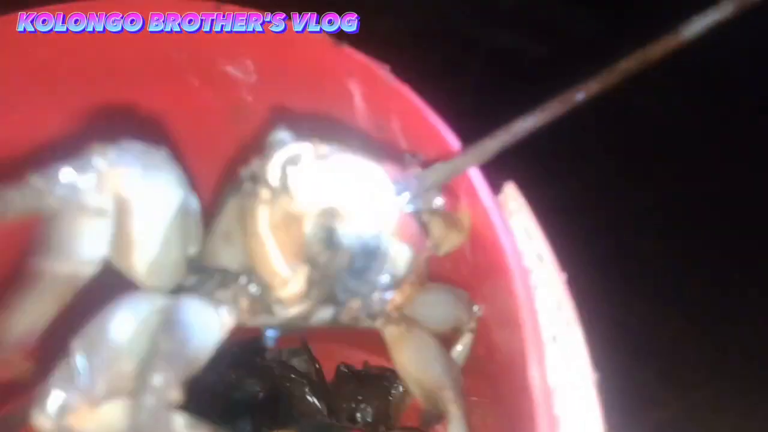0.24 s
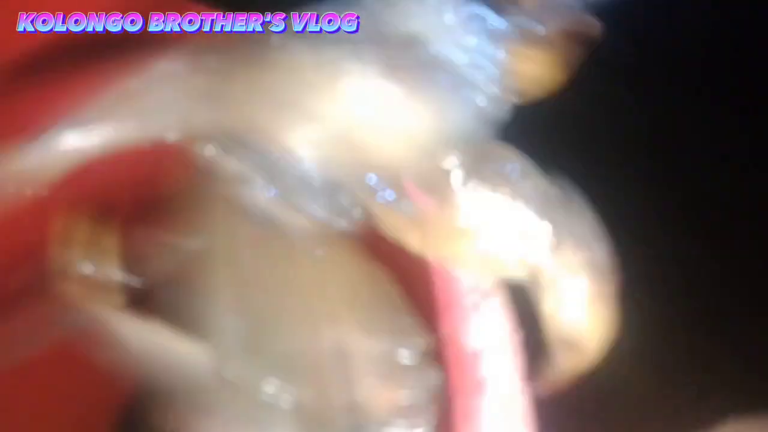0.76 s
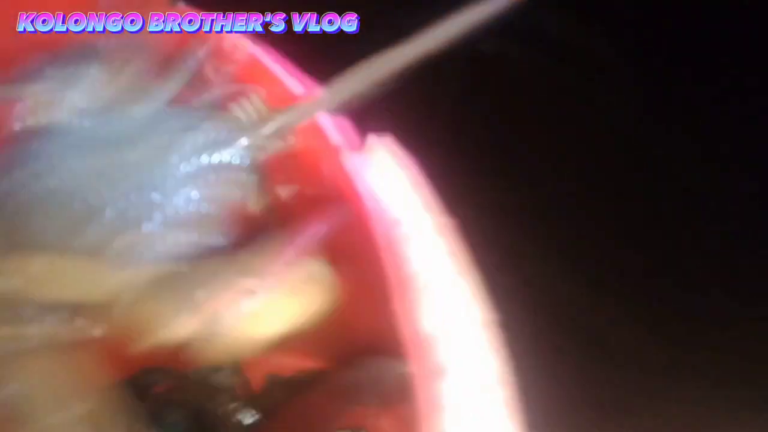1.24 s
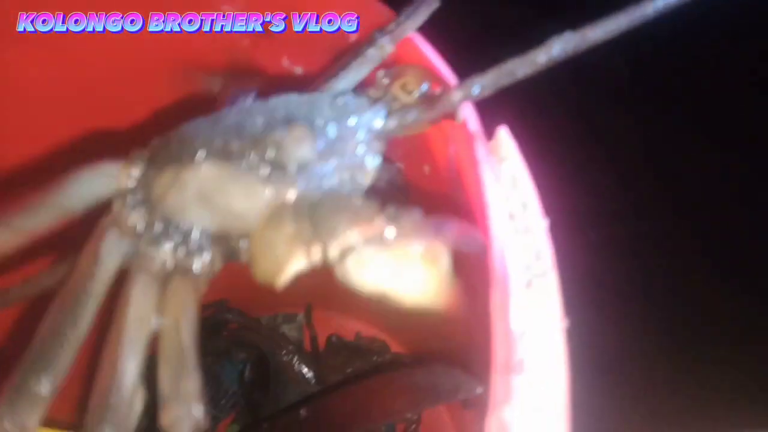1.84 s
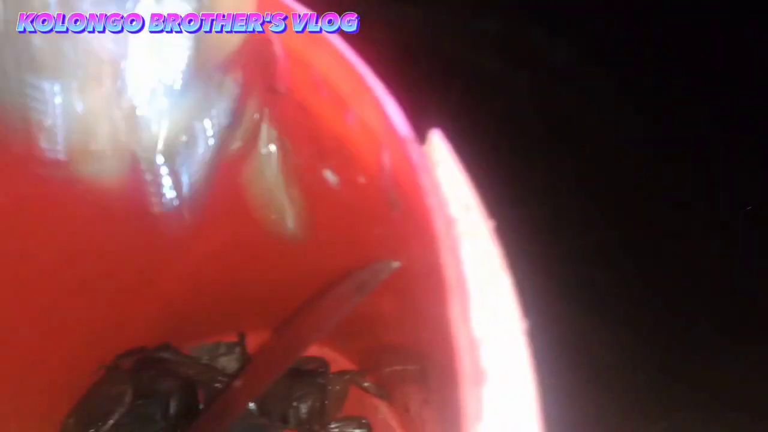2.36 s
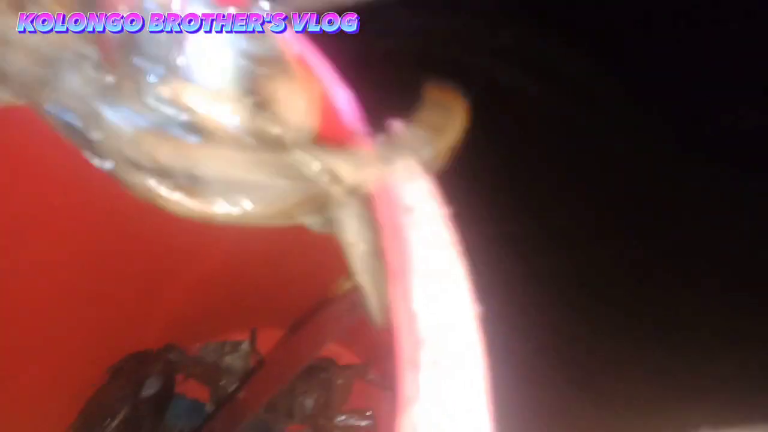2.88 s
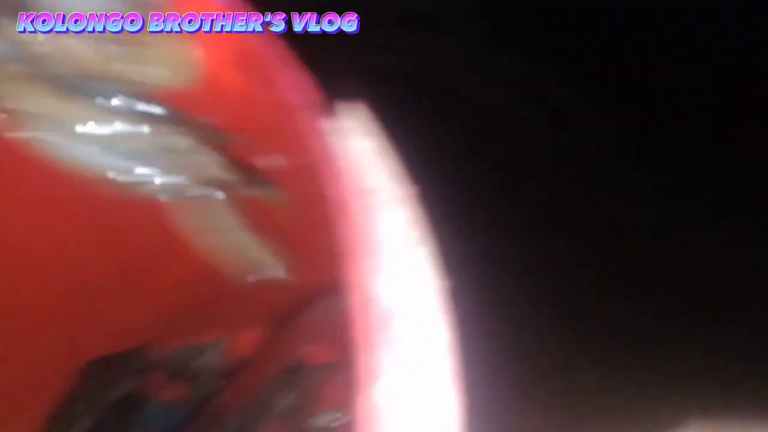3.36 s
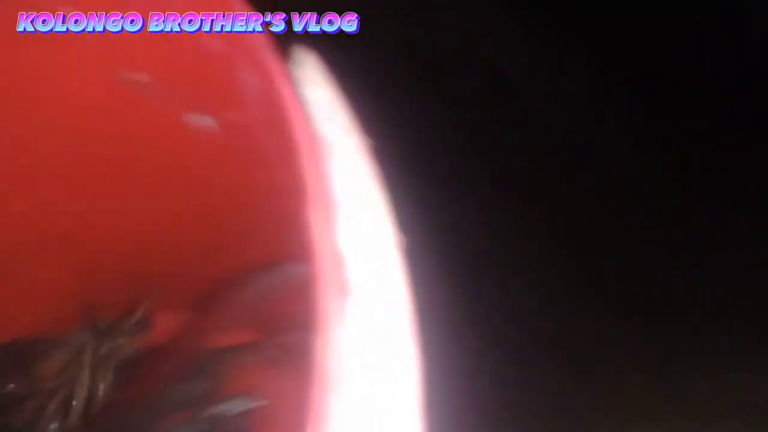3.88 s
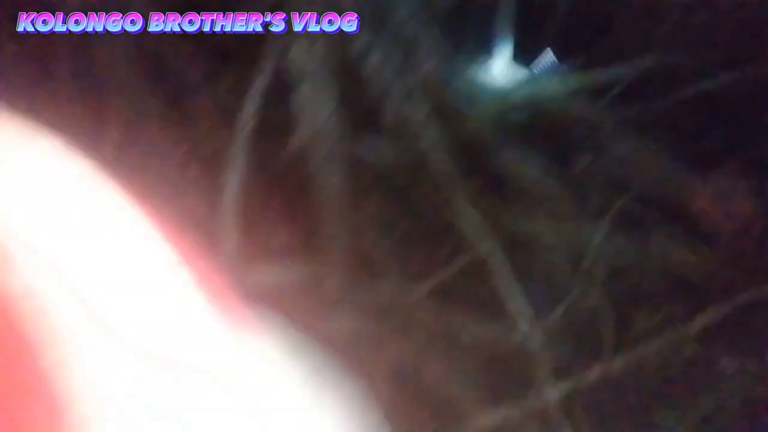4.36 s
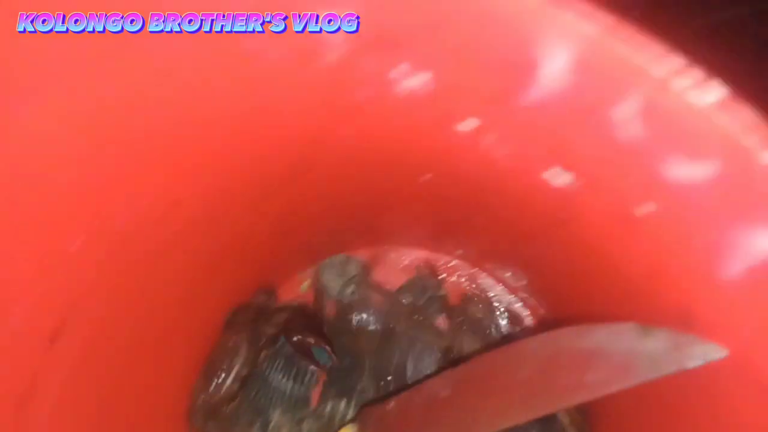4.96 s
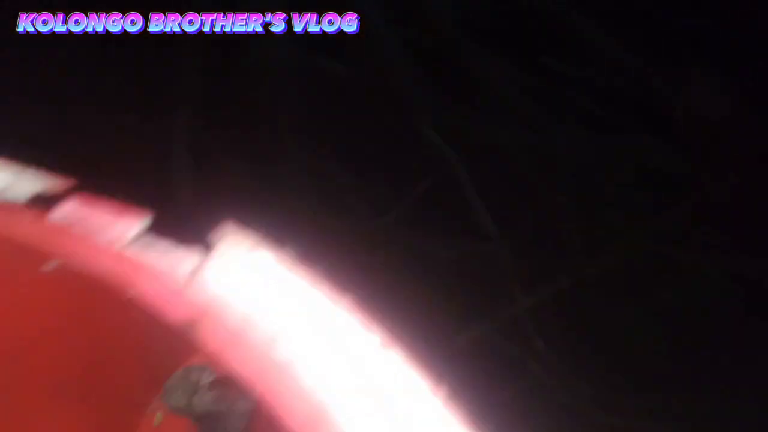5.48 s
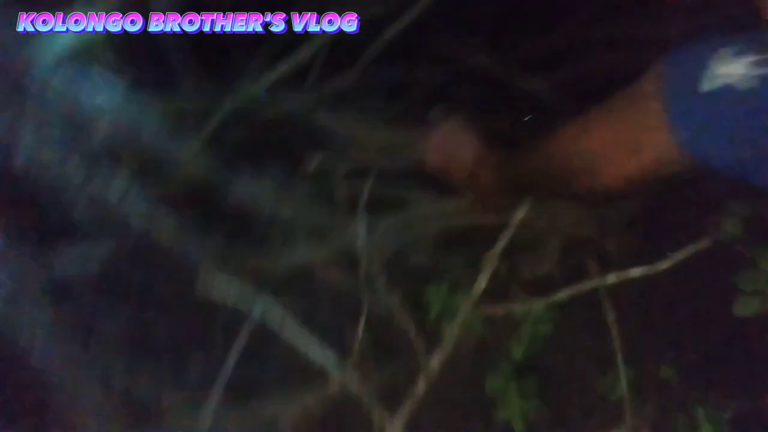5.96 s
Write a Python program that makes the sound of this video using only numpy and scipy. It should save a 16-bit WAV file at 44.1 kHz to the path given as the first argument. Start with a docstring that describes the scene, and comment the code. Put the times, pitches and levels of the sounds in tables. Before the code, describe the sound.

Hard shells click and clatter on hollow plastic, mid-pitched and quickly damped, with short gritty leg scrapes between. A busy first second gives way to separated knocks and drags, then a deep bump near four seconds and lighter rapid taps as the bucket moves through brush. A last tight cluster fades to faint scrabbling. Close, mono, dry outdoor night sound with little bass, soft hiss and very faint thin insects.

```python
"""Outdoors at night, crabs scrabble in a plastic bucket held close to a small microphone.
Claws and shells tap the wall, bodies bump it, and legs scrape along it in runs of tiny slips.
Short clicks stand for all these touches and set the bucket's modes (its own pitches) ringing.
Shaped noise gives a low rumble, a soft hiss, a later brush rustle and thin bands of night insects."""
import sys
import numpy as np
from scipy import signal
from scipy.fft import rfft, irfft, next_fast_len
from scipy.io import wavfile
from scipy.ndimage import uniform_filter1d, minimum_filter1d

SR = 44100
rng = np.random.default_rng(int(sys.argv[2]) if len(sys.argv) > 2 else 0)


def unload_audio(sound):
    """Save the sound as a 16-bit wav file, at the path given as the first command line argument."""
    columns = np.transpose(np.atleast_2d(sound))
    # keep every value between -1 and 1, then stretch to whole-number steps
    steps = np.round(np.clip(columns, -1, 1) * 32767)
    wavfile.write(sys.argv[1], SR, steps.astype(np.int16))


N = 274434

# stiff shell and rim modes of the bucket: f/Hz, width/Hz, level/dB
SHELL_MODES = [(1185, 88, -12), (1391, 93, -1.5), (1553, 176, 1), (1762, 88, -0.5), (1905, 91, 4),
               (2100, 69, -4.5), (2354, 280, 8.5), (2566, 460, 11.5), (3040, 155, 1), (3275, 48, -7),
               (4210, 720, -31), (4540, 770, -7.5)]
# slow bending modes of the bucket wall: f/Hz, width/Hz, level/dB
WALL_MODES = [(119, 56, -19), (180.8, 55, -6), (315.2, 43.3, -3), (402, 69, -2.5), (476.6, 57, 1),
              (559, 158, -1), (725.5, 83, 3.5), (1014, 91, 1)]
# faint scrabble of the whole heap: t/s, level/dB, wall boom re scrabble/dB
HEAP_STIR = [(0, -47, -4.5), (1.3, -43.5, -7), (1.75, -54.5, -3.5), (2.299, -43, -6), (2.801, -58, -0.5),
             (3.299, -47, 3.5), (4.0, -41, -4.5), (4.8, -42.5, -9.5), (5.75, -52, -9), (5.92, -52.5, -55),
             (6.11, -61.5, -34), (6.22, -52.5, -30)]


def amp(db):
    """Turn dB into a gain."""
    return 10 ** (np.asarray(db) / 20)


def rms_one(x):
    """Scale to rms 1."""
    return x / np.sqrt(np.mean(x ** 2) + 1e-20)


def drift(rate_hz):
    """Slow chance: noise smoothed twice by a one-pole low-pass, spread 1."""
    r = np.exp(-2 * np.pi * rate_hz / SR)
    noise = rng.standard_normal(N + SR)
    settled = signal.lfilter([1], [1, -2 * r, r * r], noise)[SR:]     # skip the filter's first second
    return rms_one(settled)


def coloured(x, spectrum):
    """Shape by a smooth spectrum (f/Hz, level/dB), with the phase that lets nothing sound early."""
    size = 2 * next_fast_len(N // 2 + 1)
    hz, db = np.transpose(spectrum)
    bins_hz = np.fft.rfftfreq(size, 1 / SR)
    gain = amp(np.interp(np.log(bins_hz + 1), np.log(hz), db))
    # folding the cepstrum (spectrum of the log gain) forward in time gives that phase
    cepstrum = irfft(np.log(gain), size)
    cepstrum[1:size // 2] *= 2
    response = np.exp(rfft(cepstrum[:size // 2 + 1], size))
    return irfft(rfft(x, size) * response, size)[:N]


def ring(x, hz, width_hz):
    """One mode: a unit click starts a dying wave of height 1; a wider mode dies sooner."""
    r, w = np.exp(-np.pi * width_hz / SR), 2 * np.pi * hz / SR
    return signal.lfilter([1, -r * np.cos(w)], [1, -2 * r * np.cos(w), r * r], x + 1e-18)


def soften(x):
    """Plastic swallows the top of the ringing: a low-pass at 2608 Hz."""
    return signal.sosfilt(signal.butter(4, 2608, fs=SR, output="sos"), x)


def taps():
    """Claws and shells hit the wall: each tap gives a shell click, a wall boom and a bright tick."""
    # blows before softening: t/s, level/dB, wall boom re level/dB, tick re level/dB
    tap_table = [(0.0203, -5, -7, -40), (0.1252, -29.5, 9.5, -42), (0.2815, -21.5, 1, -28),
                 (0.322, -4.5, -17.5, -24), (0.399, -15, -16, -22), (0.4425, -3, -23, -19.5),
                 (0.5538, -10, -26, -21.5), (0.646, -16, -46, -51), (0.718, -0.5, -33, -21),
                 (0.7453, -1.5, -22, -33), (0.871, -25, -51, -19), (0.8915, -15, -10, -10.5),
                 (0.952, -8.5, -11.5, -32), (0.9962, -3, -32, -31), (1.0068, 0, -34, -8),
                 (1.0716, 2.5, -18, -26), (1.2439, 0, -7.5, -22.5), (1.2971, -18.5, -38, -13.5),
                 (1.6269, -2, -5.5, -16.5), (1.8997, -1.5, -3, -20.5), (2.0299, -16, -9, -24),
                 (2.0763, 4, -15.5, -16.5), (2.255, -21.5, -5.5, -13.5), (2.3564, -8, -9, -40),
                 (2.4015, 3.5, -13, -46), (2.6935, -1.5, -28, -19.5), (2.869, -31.5, 2.5, -10),
                 (3.6863, -1.5, -54, -19.5), (3.665, -27, -35, -30), (3.7738, -19.5, -18, -15),
                 (3.953, -15, -12, -23), (4.028, -16, -39, -26), (4.106, -20, -5, -25),
                 (4.148, -15.5, -9, -20), (4.1607, -11, -25, -29), (4.197, -10, -19, -24),
                 (4.236, -18, -10, -11), (4.2451, -15, -30, -29), (4.2621, -15, -16, -6.5),
                 (4.3982, -16.5, -14, -18.5), (4.5195, -25, -5, -26), (4.5376, -12, -6, -35),
                 (4.757, -20.5, -3, -43), (4.7713, -3.5, -46, -20), (4.793, -22, -39, -22),
                 (4.806, 2, -23, -10), (4.8407, -13.5, -40, -21), (4.9866, -19, -4, -17),
                 (5.05, -23, -18, -9), (5.1033, -15, -20, -44), (5.1534, -15.5, -43, -41),
                 (5.3158, -21, -11, -29), (5.3666, -15.5, -17, -32), (5.457, -12, -21, -52),
                 (5.4807, -4.5, -33, -26), (5.4933, -8, -12, -26), (5.5135, -10, -13, -28),
                 (5.673, -5, -32, -26), (5.7089, -3.5, -30, -22), (5.7187, -1, -45, -37),
                 (6.133, -35, -30, -14)]
    s, db, boom_db, tick_db = np.transpose(tap_table)
    clicks = np.zeros(N)
    clicks[(s * SR).astype(int)] = amp(db + tick_db)
    return strike(SHELL_MODES, s, db) + strike(WALL_MODES, s, db + boom_db) + tick(clicks)


def strike(modes, at, blow_db):
    """A blow and two quick, weaker bounces ring the modes; the first touch drives all the same way."""
    bounce_s, bounce_db = 0.00249, -7     # scale of the gap before a bounce; loss at each bounce
    out = np.zeros(N)
    gaps = bounce_s * rng.uniform(0.43, 1.629, (len(at), 3)) * [0, 1, 1]
    lags = np.cumsum(gaps, axis=1)
    where = ((at[:, None] + lags) * SR).astype(int)
    for hz, width_hz, mode_db in modes:
        clicks = np.zeros(N)
        touch_db = blow_db[:, None] + mode_db + bounce_db * np.arange(3)
        size = amp(touch_db) / np.sqrt(len(modes))     # the modes share the blow
        # powers 0, 1, 2: only the middle touch has a chance sign
        sign = rng.choice([-1, 1], where.shape) ** np.arange(3)
        np.add.at(clicks, where, size * sign)
        out += ring(clicks, hz, width_hz)
    return soften(out)


def tick(clicks):
    """Hard contact above the modes: each click gives a spit of bright noise that dies in a few ms."""
    # colour of the spit: f/Hz, level/dB
    tick_spectrum = [(2000, -5.5), (3500, 21), (4570, 13), (5640, -5), (8360, -5.5), (10800, -17),
                     (15500, -22)]
    t60_s = 0.0096     # time to fade by 60 dB
    fade = signal.lfilter([1], [1, -amp(-60 / (t60_s * SR))], np.abs(clicks))
    return coloured(fade * rng.standard_normal(N), tick_spectrum)


def bumps():
    """A body's long soft contact drives only the wall modes near the pitch its place favours."""
    # bumps before the low-pass: t/s, level/dB, favoured pitch f/Hz
    bump_table = [(0.214, -4.5, 185.4), (0.744, 5, 205), (0.883, -7, 186.5), (0.94, -3, 172.4),
                  (1.068, 2, 301), (2.087, -8.5, 185), (3.945, 15.5, 143.6), (3.983, -8.5, 170),
                  (4.462, 1.5, 381), (4.493, -9, 398), (4.559, -3.5, 385), (4.602, -10.5, 404),
                  (4.904, -16.5, 316), (4.986, -11, 312)]
    s, db, place_hz = np.transpose(bump_table)
    out = np.zeros(N)
    for hz, width_hz, mode_db in WALL_MODES:
        octaves_off = np.abs(np.log2(hz / place_hz))
        clicks = np.zeros(N)
        clicks[(s * SR).astype(int)] = amp(db + mode_db - 92 * octaves_off)
        out += ring(clicks, hz, width_hz)
    return signal.sosfilt(signal.butter(2, 396, fs=SR, output="sos"), out)     # low-pass, Hz


def scraping():
    """Leg tips stick and slip: clumped clicks of uneven size under the pressure of drags and heap."""
    # legs dragging on the plastic: start t/s, length/s, crest level/dB, place of crest (0-1),
    # wall boom re scrape/dB
    drag_table = [(0.004, 0.039, -21.5, 0.67, 5), (0.19, 0.033, -18.5, 0.6, 4),
                  (0.254, 0.011, -22.5, 0, -0.5), (0.345, 0.015, -23, 0.5, -27),
                  (0.439, 0.1, -10.5, 0.77, 0), (0.643, 0.055, -26.5, 0.4, -28),
                  (0.709, 0.1, -17.5, 0.04, -7), (0.819, 0.012, -40, 0.9, -17), (0.882, 0.069, -35, 0.6, 0),
                  (0.945, 0.22, -29.5, 0, -12.5), (1.129, 0.066, -32, 0.3, 10), (1.162, 0.1, -18, 0.63, 3),
                  (1.39, 0.047, -28.5, .8, -10), (1.465, 0.0093, -26, 0.5, -7), (1.719, 0.022, -33, 1, -19),
                  (1.924, 0.024, -17, .05, -7), (2.021, 0.16, -20.5, 0.32, -2),
                  (2.213, 0.21, -38.5, 0.7, -1), (2.402, 0.11, -25, 0.12, 1),
                  (2.529, 0.071, -31, 0.2, -0.5), (2.568, 0.12, -19, 0.47, 3.5),
                  (2.865, 0.052, -29, 1, -9.5), (2.982, 0.051, -27, 0.1, -34),
                  (3.051, 0.12, -15.5, 0.23, 1), (3.322, 0.049, -35.5, 0.63, 10.5),
                  (3.526, 0.061, -15.5, 0.67, -6.5), (3.623, 0.019, -36.5, 0.1, -30),
                  (3.692, 0.032, -11, 0.8, -29), (3.799, 0.056, -19.5, 0.2, -11.5),
                  (3.951, 0.26, -33, 0, -10), (4.218, 0.048, -21, 0.6, -3.5),
                  (4.451, 0.016, -12.5, 0.3, -8.5), (4.476, 0.024, -21, 0.4, -9.5),
                  (4.634, 0.099, -30.5, 0.6, -16), (4.908, 0.0077, -25.5, 0, -1),
                  (5.086, 0.17, -35, 0.6, -7.5), (5.398, 0.038, -20, 0, -21), (5.473, 0.19, -31, 0, -7),
                  (5.668, 0.028, -18.5, 0.1, -35), (5.695, 0.17, -31.5, 0.26, -2),
                  (6.056, 0.0057, -34.5, 0.29, -36)]
    heap_s, heap_levels, heap_booms = np.transpose(HEAP_STIR)
    time = np.arange(N) / SR
    heap_db, heap_boom_db = np.interp(time, heap_s, heap_levels), np.interp(time, heap_s, heap_booms)
    pressure = amp(heap_db + 5.8 * drift(16.3))     # the heap stirs in fits
    boom = pressure * amp(heap_boom_db)
    for s, length, crest_db, crest, boom_db in drag_table:
        a, b = round(s * SR), round((s + length) * SR)
        shape = stroke(b - a, crest)
        pressure[a:b] += amp(crest_db) * shape
        boom[a:b] += amp(crest_db + boom_db) * shape

    # a drag bites at once and lets go a little later
    edge_s = 0.0046
    ease = np.exp(-1 / (edge_s * SR))
    eased = signal.lfilter([1 - ease], [1, -ease], [pressure, boom])
    pressure, boom = np.maximum([pressure, boom], eased)
    dryness = pressure / boom     # shell on shell: little boom, more bite
    lightness = 1 / (1 + pressure / amp(-21.0))     # a light touch stutters, a hard drag rasps evenly

    slips_per_s, size_spread_db, clump_db = 2500, 2.5, 4.5
    uneven_db = size_spread_db * (0.6854 + 0.33 * lightness) * np.minimum(rng.exponential(1, N), 4)
    sizes = amp(uneven_db + lightness * clump_db * drift(61))
    slips = sizes * (rng.random(N) < slips_per_s / SR) * rng.choice([-1, 1], N)
    # the drag spends its force at an even pace, levelled over 0.09 s
    slips /= np.sqrt(uniform_filter1d(slips ** 2, round(.09 * SR)))

    shell = rub(SHELL_MODES, slips, pressure, dryness, lightness)
    # dryness 1.12: legs drive the lowest wall modes slightly less than the higher ones
    wall = rub(WALL_MODES, slips, boom * amp(0.5), 1.12, lightness)     # boom raised 0.5 dB
    spit = tick(slips ** 2 * pressure * amp(-63.5))     # squaring favours the big slips
    return shell + wall + spit


def stroke(count, crest):
    """Pressure of one drag: bites, swells to its crest, then dies away; top 1."""
    bite = 0.32     # share of the crest at first contact
    u = (np.arange(count) + .5) / count
    crest = np.clip(crest, .01, .99)
    swell = bite + (1 - bite) * (u / crest) ** 0.99
    fade = (1 - u) / (1 - crest)
    return np.where(u < crest, swell, fade)


def rub(modes, slips, pressure, dryness, lightness):
    """The contact point wanders, most under a light touch, so each mode swells on its own."""
    even, pressed = 0, 0
    for hz, width_hz, db in modes:
        wander_db = lightness * 5.88 * drift(75) + 2.16 * drift(21.0)
        drive = slips * amp(db + wander_db)
        tilt = dryness ** (0.5 * np.log2(hz / 2100))     # a dry contact leans on the high modes
        even = even + ring(drive, hz, width_hz)
        pressed = pressed + ring(drive * pressure * tilt, hz, width_hz)
    # dividing by the same rub at pressure 1 lets the pressure set the level
    return soften(pressed) / np.std(soften(even))


def stray_taps():
    """Leg tips click on shells at random, stronger where the heap stirs more."""
    taps_per_s, above_heap_db, spread_db = 12, 14.5, 6.8
    s = rng.uniform(0, N / SR - .02, round(taps_per_s * N / SR))
    heap_s, heap_levels, _ = np.transpose(HEAP_STIR)
    heap_db = np.interp(s, heap_s, heap_levels)
    return strike(SHELL_MODES, s, heap_db + above_heap_db + rng.normal(0, spread_db, len(s)))


def rustle():
    """The bucket is carried through brush: patchy bright noise that comes in swishes."""
    # course of the rustle, around which it drifts: t/s, level/dB
    rustle_levels = [(3.5, -93), (3.95, -58), (4.4, -71.5), (6.22, -65)]
    bright = signal.butter(2, [2600, 5900], "band", fs=SR, output="sos")     # band edges, Hz
    band = rms_one(signal.sosfilt(bright, rng.standard_normal(N)))
    course_db = np.interp(np.arange(N) / SR, *np.transpose(rustle_levels))
    return amp(course_db + 2.7 * drift(16)) * band


def night():
    """Rumble and hiss from shaped noise, with insects as noise rung twice through a narrow band."""
    # colour of rumble and hiss, relative only: f/Hz, level per Hz/dB
    night_spectrum = [(15, -39), (25, -4), (97, -4.5), (250, -10.5), (550, -32.5), (1100, -18.5),
                      (2610, -22), (4800, -44), (6600, -69.5), (16000, -59)]
    # insects: f/Hz, width of each ringing/Hz, level before its drift/dB
    insect_bands = [(5560, 250, -81.5), (7800, 740, -76), (10200, 400, -90)]
    out = amp(-48) * rms_one(coloured(rng.standard_normal(N), night_spectrum))
    for hz, width_hz, db in insect_bands:
        once = ring(rng.standard_normal(N), hz, width_hz)
        band = ring(once, hz, width_hz)
        out += amp(db + 2 * drift(30)) * rms_one(band)
    return out


def scene():
    """All sources added into one channel."""
    mix = taps() + bumps() + scraping() + stray_taps() + rustle() + night()
    return mix[None]


def record(dry):
    """The small microphone loses the bass; a limiter holds the peaks, then the top is cut."""
    bass_cut_hz, top_cut_hz = 78.6, 16000
    ceiling, span_s = 0.68, 0.0016     # limiter's peak before the top cut; time its gain spans
    thin = signal.sosfilt(signal.butter(4, bass_cut_hz, "high", fs=SR, output="sos"), dry)
    span = round(span_s * SR)
    allowed = np.minimum(1, ceiling / (np.abs(thin) + 1e-9))     # gain that each sample allows
    gain = uniform_filter1d(minimum_filter1d(allowed, span), span)
    return signal.sosfilt(signal.ellip(10, 1, 60, top_cut_hz, fs=SR, output="sos"), thin * gain)


dry = scene()
out = record(dry)
unload_audio(out)
```